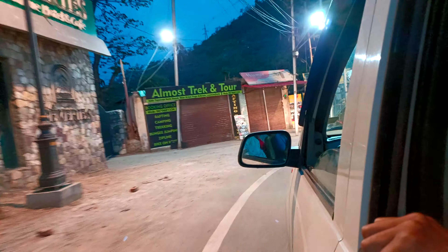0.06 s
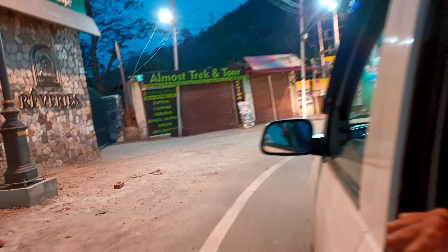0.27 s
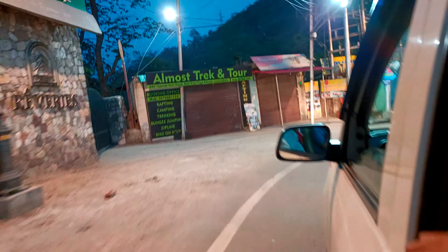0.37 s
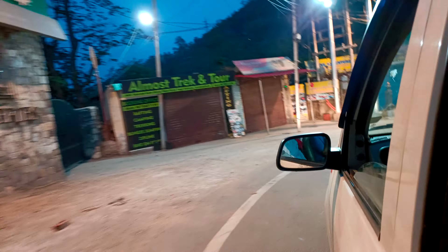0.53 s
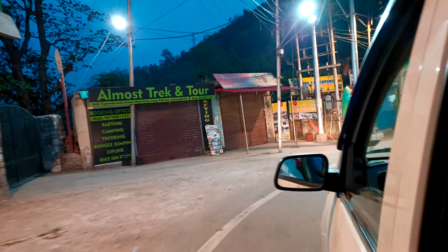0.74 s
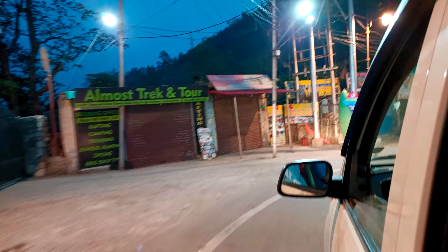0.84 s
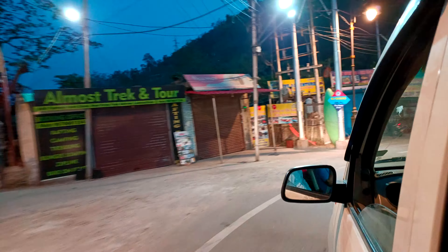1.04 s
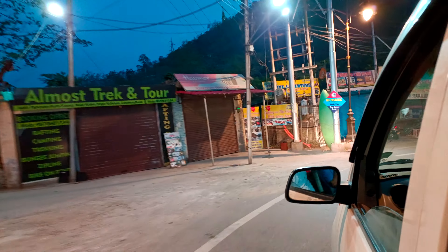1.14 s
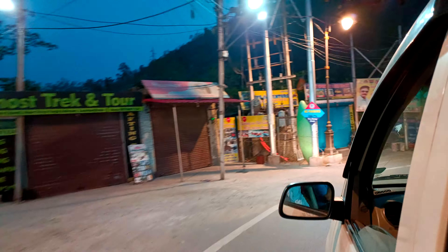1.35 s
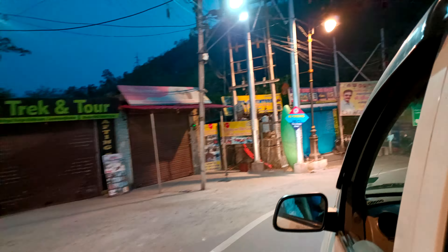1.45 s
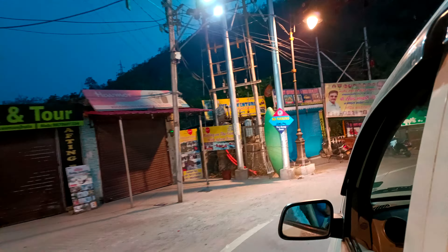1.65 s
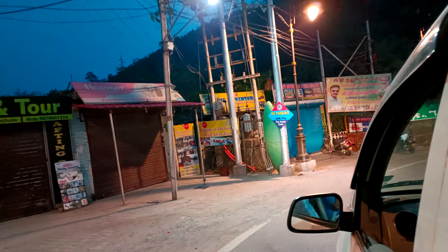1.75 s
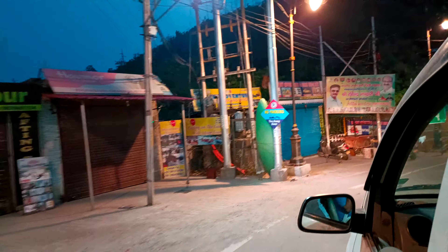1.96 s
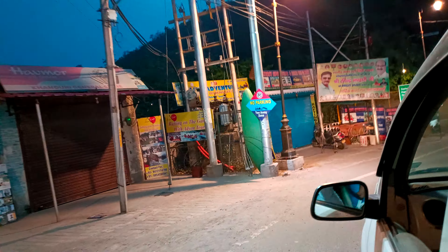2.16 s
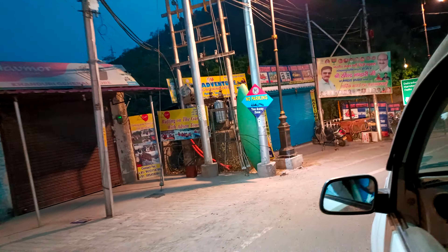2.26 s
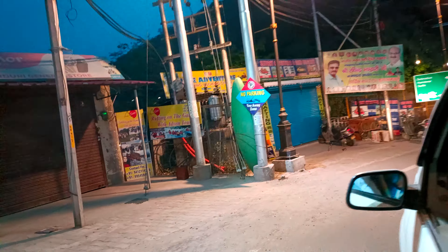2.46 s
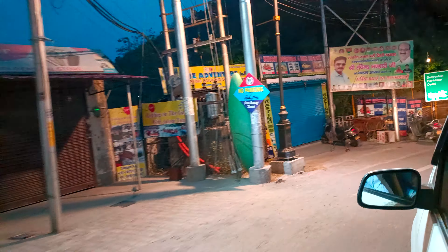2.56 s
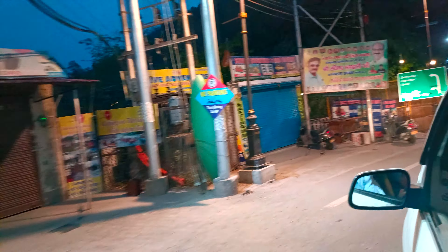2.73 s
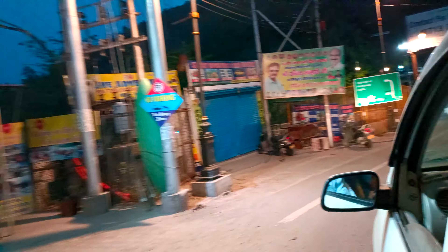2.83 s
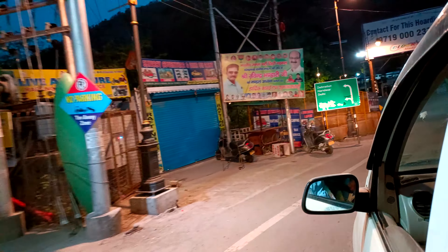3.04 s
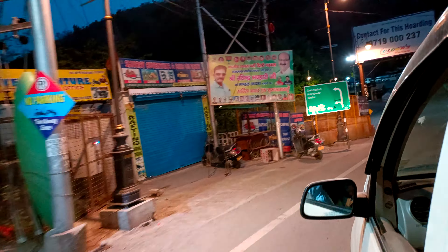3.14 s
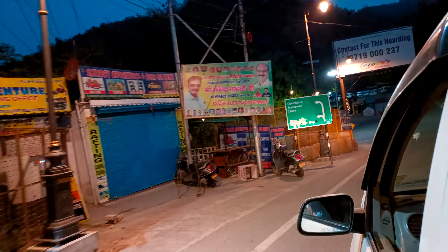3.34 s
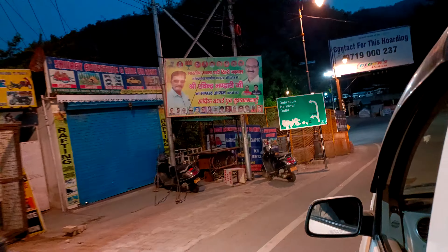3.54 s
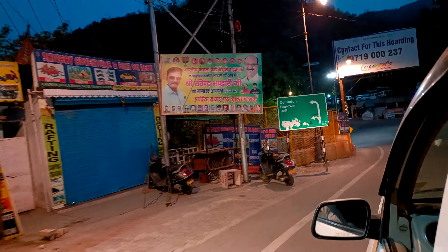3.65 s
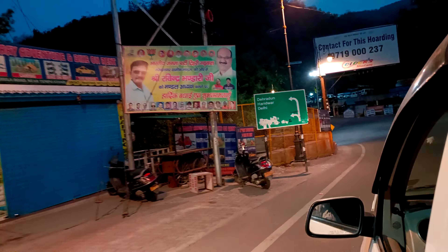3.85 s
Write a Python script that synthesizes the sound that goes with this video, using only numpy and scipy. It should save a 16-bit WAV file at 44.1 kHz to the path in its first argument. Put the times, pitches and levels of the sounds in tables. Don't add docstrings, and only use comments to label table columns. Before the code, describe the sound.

Low wind buffets a microphone held out of a moving car's window, over engine drone and tyre hiss, turning rougher and crackly halfway.

```python
import sys
import numpy as np
from scipy import signal
from scipy.fft import rfft, irfft
from scipy.io import wavfile
from scipy.ndimage import uniform_filter1d, minimum_filter1d

SR = 44100
rng = np.random.default_rng(int(sys.argv[2]) if len(sys.argv) > 2 else 0)


def elevation(decibels):
    levels = np.asarray(decibels, float)
    return 10 ** (levels / 20)


def transcribe(u):
    v = np.clip(np.atleast_2d(u).T, -1, 1)
    q = np.round(v * 32767).astype(np.int16)
    wavfile.write(sys.argv[1], SR, q)


N = 273420
TIME = np.arange(N) / SR
PORT_LAG = 22
MID_FIRING_HZ = 27.7

# (frequency [Hz], left port [dB], right port [dB])
CLATTER_COLOUR = [(1600, -20, -12), (2500, -12, -4), (4000, -8, 0), (6200, -13, -2), (7000, -22, -17),
                  (8100, -21, -36), (9500, -23, -24), (14000, -34, -22), (15600, -50, -30)]
# (frequency [Hz], left port [dB], right port [dB])
AIR_COLOUR = [(5000, -6, -15), (6800, 2, -8), (7700, 6, -9), (8200, 5, -13), (9300, 4, 0), (11000, 1, -1),
              (12500, -4, -1), (14200, -12, 1.5), (15700, -30, -6)]


def curves(table):
    s, *columns = np.transpose(table)
    return [np.interp(TIME, s, column) for column in columns]


def unit(x):
    return x / np.sqrt(np.mean(x ** 2))


def band(x, hz, width):
    return signal.lfilter(*signal.iirpeak(hz, hz / width, fs=SR), x)


def dull(x, top_hz):
    return signal.sosfilt(signal.butter(4, top_hz, fs=SR, output="sos"), x)


def noise(low_hz, high_hz, top_hz, even_s):
    slopes = signal.butter(1, [low_hz, high_hz], "band", fs=SR, output="sos")
    x = dull(signal.sosfilt(slopes, rng.standard_normal(N)), top_hz)
    span = int(even_s * SR)
    power = uniform_filter1d(uniform_filter1d(x ** 2, span), span)
    return x / np.sqrt(power)


def walk(rate):
    k = int(SR / rate)
    steps = np.repeat(rng.standard_normal(N // k + 1), k)
    return unit(uniform_filter1d(uniform_filter1d(steps, k), k)[:N])


def hiss(table, alike):
    hz, *port_db = np.transpose(table)
    f = np.log(np.arange(N // 2 + 1) * SR / N + 1)
    right, other = rng.standard_normal((2, N))
    left = alike * right + np.sqrt(1 - alike ** 2) * other
    ports = []
    for x, db in zip([left, np.roll(right, PORT_LAG)], port_db):
        colour = elevation(np.interp(f, np.log(hz), db, -60, -60))
        ports.append(irfft(rfft(x) * colour, N))
    return np.array(ports) / np.sqrt(np.mean(ports[1] ** 2))


def bumps(times, gains, lengths_s):
    power = np.zeros(N)
    for s, g, d in zip(times, gains, lengths_s):
        near = slice(max(int((s - 2 * d) * SR), 0), int((s + 2 * d) * SR))
        power[near] += g ** 2 * np.exp(-np.abs(1.8 * (TIME[near] - s) / d) ** 3)
    return np.sqrt(power)


def buffet(db, corner_hz, top_hz, flutter_db):
    return elevation(db + flutter_db * walk(30)) * noise(38.4, corner_hz, top_hz, 0.088)


def lulls():
    # (time [s], depth with either sign [dB], length [ms])
    gaps = [(3.067, 5, 8), (3.315, -10, 22), (3.337, -11, 10), (3.373, -7, 9), (3.397, -2, 8),
            (3.429, -5, 7), (3.446, -3, 25), (3.503, -9, 6.3), (3.529, -8, 8), (3.559, -19, 17),
            (3.596, -4, 12), (3.639, -11, 9.7), (3.679, -10, 27), (3.765, -0.5, 16), (3.864, -5, 11),
            (4.022, -4, 8), (4.089, -15, 25), (4.126, -10, 6.1), (4.16, -19, 9.2), (4.227, -17, 12.8),
            (4.265, -4, 12), (4.337, -14, 15), (4.38, -7.5, 9), (4.46, -3, 19), (4.518, -2, 23),
            (4.603, -13, 21), (4.671, -10, 4), (4.933, -5, 7.2), (5.063, -10, 6.6), (5.125, -12, 6.1),
            (5.175, -9, 25), (5.269, -8, 12), (5.345, -1, 7), (5.386, -2, 6), (5.459, -1, 25),
            (5.51, -11, 8), (5.529, -9, 10), (5.592, -6.5, 20), (5.747, -9, 18), (5.818, -6, 22),
            (5.862, 0, 24), (5.898, -10, 13), (6.004, -2.5, 15), (6.072, -5, 20), (6.184, -6, 5.7)]
    s, depth_db, ms = np.transpose(gaps)
    return elevation(-0.96 * bumps(s, depth_db, ms / 900))


def crowd(gust_db, swung):
    per_s = 20
    chance = rng.standard_normal((int(N / SR * per_s), 4)).T
    s = (np.arange(chance.shape[1]) + .5 + 0.13 * chance[0]) / per_s
    s = np.clip(s, 0, TIME[-1])
    base_db = (gust_db - 10.5 - 8.5 * swung)[(s * SR).astype(int)]
    return s, base_db + 3.5 * chance[1], -24 + 5 * chance[2], 12 * np.exp(1.07 * chance[3])


def snaps():
    # (time [s], level [dB], brightness [dB])
    tears = [(3.252, -26, -18), (3.5206, -24, -10), (3.5368, -25, -15), (3.899, -30, -9), (3.9446, -27, -2),
             (4.0267, -33, -15), (4.0466, -25, -14), (4.1152, -22, -17), (4.1325, -21, -16),
             (4.1443, -17, -5), (4.1705, -22.5, 1), (4.1807, -22, -2), (4.189, -28, -16), (4.205, -40, 9),
             (4.2944, -21, -6), (4.3123, -17, -1), (4.3284, -27, -9), (4.3526, -34, -12),
             (4.3652, -15.5, 1.5), (4.3921, -30, -14), (4.4294, -15.5, -11), (4.434, -29, -6),
             (4.474, -23.5, -4), (4.55, -30, -3), (4.556, -22, -7), (4.5609, -19, -14), (4.6658, -31, -16),
             (4.6783, -33, -13), (4.694, -33, -11), (4.702, -27, -8), (4.7123, -24, -2), (4.8205, -24, -13),
             (4.8261, -26, -15), (4.946, -22, -11), (4.9506, -24, -2), (4.979, -27, -11), (5.0044, -20, -3),
             (5.011, -27, 2), (5.0205, -35, -10), (5.101, -25, -24), (5.1117, -29, -18), (5.1172, -24, -13),
             (5.134, -29, -14), (5.255, -25, 6), (5.2597, -30, 5.5), (5.3355, -30, -11), (5.3543, -25, -16),
             (5.3682, -21, 5.5), (5.3729, -32, -4), (5.419, -27, -20), (5.5022, -33, -12), (5.52, -28, -9),
             (5.5412, -28, -8), (5.558, -27, 13.5), (5.605, -31, 2), (6.0942, -23, -14), (6.108, -31, -7),
             (6.1297, -19, -17), (6.1777, -24, -12), (6.1918, -26, -14)]
    s, db, bright_db = np.transpose(tears)
    lengths_s = np.full(len(s), 0.0018)
    snap = bumps(s, elevation(db + 6), lengths_s) * noise(730.0, 3000.0, 2500.0, 0.00077)
    tick = bumps(s, elevation(db + bright_db + 2.5), 0.8 * lengths_s) * noise(1950.0, 3050.0, 5900.0, 0.00089)
    return dull(snap, 2400.0) + dull(tick, 4900.0)


def eddies(small, gain):
    # (time [s], level [dB], brightness [dB], length [ms])
    timed = [(2.89, -9, -9, 19), (3.114, -15, -8, 43), (3.253, -15, -3, 17), (3.278, -17, -16, 32),
             (3.292, -9, -13, 7), (3.362, -12, -14, 51), (3.537, -10, 4, 47), (3.616, -7.5, -16, 37),
             (3.719, -10, -10, 20), (3.884, -8, -15, 7.6), (3.906, -8.5, -7, 32), (3.952, -13, -6, 5.3),
             (4.047, -2, 1, 3.5), (4.058, -10, -11, 73), (4.134, -12, -3, 17), (4.145, -14, 11, 8.5),
             (4.169, -8, -6, 34), (4.212, -16, -6, 25), (4.241, -6.5, -1, 15), (4.314, -10.5, -10, 130),
             (4.37, -10, -4.5, 41), (4.432, -10.5, -2, 17.6), (4.444, -8, -14, 6.1), (4.476, -9, -11, 20),
             (4.553, -13, 0, 44), (4.703, -12.5, -4, 37), (4.82, -5, -3.5, 17), (4.867, -12.5, -1.5, 23),
             (4.947, -10, -5.5, 19), (4.96, -12, -4, 7), (5.002, -10.5, -5, 34), (5.018, 0, 1, 4),
             (5.107, -10.5, -0.5, 28), (5.133, -16, -1, 14), (5.244, -8, -8, 27), (5.295, -12, -22, 33),
             (5.313, -12, -7, 6), (5.401, -18.5, -5, 48), (5.416, -13, -12, 6), (5.543, -4, -16, 6),
             (5.562, -8.5, -6, 68), (5.628, -17, -19, 82), (5.765, -13, -22, 25), (5.886, -24, -31, 23),
             (5.915, -12.5, -27, 30), (5.992, -12.5, -13, 24), (6.078, -20, -3, 6.4),
             (6.098, -11, -13, 27), (6.177, -4, -3, 22), (6.194, -10, -10, 6)]
    # (time [s], level [dB], brightness [dB])
    further = [(2.924, -8, -7.5), (3.133, -11, -14), (3.177, -15, -25), (3.224, -10.5, -12), (3.236, -8, -1),
               (3.33, -18, -7), (3.392, -15, -15), (3.417, -17, -15), (3.467, -14, -8), (3.501, -7, -11),
               (3.516, -8, -3), (3.584, -9.5, -19), (3.656, -4, -12), (3.669, -19, -4), (3.758, -13, -10),
               (3.787, -10.5, -13), (3.828, -14, -9), (3.843, -16, -3.5), (3.871, -18, -22),
               (3.937, -5, -4.5), (3.963, -15, -19), (3.977, -13, -17), (4.004, -4, -14), (4.029, -8, 2),
               (4.112, -6, -5), (4.274, -14, -9), (4.291, -12, -5), (4.327, -1, -12), (4.392, 1, -19),
               (4.536, -15, 2), (4.591, -10, -4), (4.625, -6.5, -23), (4.665, -8, -13), (4.678, -16, 1),
               (4.73, -6, -16), (4.743, -12, -21), (4.916, -7, -13), (4.979, -16, 4), (5.054, -17, -18),
               (5.147, -8, -12), (5.189, -3, -11), (5.336, -10, -1), (5.364, -4, -3), (5.44, -15, -20),
               (5.484, -13, -8), (5.502, -5, -10), (5.519, -5.5, -2), (5.614, -20, -16), (5.652, -21, -17),
               (5.708, -15, -18), (5.733, -16, -12), (5.823, -10, -22), (5.844, -18, -26), (5.98, -17, -2),
               (6.024, -12.5, -19), (6.042, -10, -18), (6.057, -9, -8), (6.126, -11, -6), (6.139, -9, -7),
               (6.165, -4, -9)]
    # (time [s], level [dB], length [ms])
    swirls = [(.019, -13, 22), (.179, -15, 42), (.32, -13, 17), (.43, -17, 26), (.56, -10, 38),
              (.63, -9.5, 26), (.715, -16.5, 36), (.825, -5, 8), (.879, -5, 17), (1.01, -24, 27),
              (1.076, -5.5, 5.4), (1.27, -22, 37), (1.317, -13.5, 13), (1.407, -16.5, 8.3),
              (1.581, -17.5, 65), (1.9, -15.5, 21), (2.214, -11, 16), (2.405, -17.5, 53), (2.47, -8, 7.9),
              (3.285, -8.5, 27), (3.41, -19, 48), (3.78, -17, 41), (4.6, -9, 10), (5.187, 6, 9.8),
              (5.393, -12.5, 56), (5.625, -17, 33), (6.032, -20, 44)]
    further_rows = np.insert(further, [3], 9.3, axis=1).T
    swirl_rows = np.insert(swirls, [2], -28, axis=1).T
    s, db, bright_db, ms = np.hstack([np.transpose(timed), further_rows, swirl_rows, small])
    grain = 0.9 * walk(150) + 0.3 * walk(60)
    body = bumps(s, elevation(db), ms / 800) * elevation(1.93 * grain) * noise(121.0, 446.0, 720.0, 0.01)
    body = np.where(TIME > 2.83, body, dull(body, 537))
    fast = bumps(s, elevation(db + bright_db - 3.4), ms / 900)
    edge = fast * elevation(3 * grain) * noise(640., 1000., 1300., .007)
    fray = fast * elevation(9.2 * walk(350) - 30.5) * noise(1400.0, 3600.0, 2200.0, 0.0033)
    return gain * (body + edge + fray)


def thumps():
    # (time [s], level [dB], length [ms])
    slow = [(0.072, -10.5, 40), (0.413, -3, 17), (0.912, -11, 62), (1.477, -12, 85), (2.06, -13, 42),
            (2.522, -20.5, 170), (2.644, -13, 39), (2.855, -20, 84), (3.358, -21, 180), (3.556, -29, 130),
            (3.644, -6, 17), (3.755, -10, 45), (4.221, -16, 55), (4.463, -16, 160), (4.556, -13, 41),
            (4.986, -12.5, 83), (5.383, -13, 15), (5.641, -9, 103), (6.102, -9, 37)]
    s, db, ms = np.transpose(slow)
    return bumps(s, elevation(db), ms / 1000) * noise(48.0, 160.0, 243.0, 0.0084)


def exhaust(firing_hz, since, chance):
    # (time [s], exhaust boom [dB], rasp of the upper resonances [dB])
    load = [(0, -17.5, -30), (.5, -29.5, 4.5), (1, -18.5, -1), (1.4, -25, 4), (1.8, -21, 0.5),
            (2.2, -19, -8), (2.7, -18.5, -1), (2.95, -24, -11), (3.3, -16.5, -5), (3.7, -17.5, -10),
            (4.2, -16, 2.5), (4.5, -18, -0.5), (4.8, -11.5, -24), (5.1, -14.5, -18), (5.5, -18, -7),
            (6.2, -17, -18)]
    # (frequency [Hz], width [Hz], level [dB])
    low_modes = [(106.5, 17.8, 4.5), (127.8, 33.4, 2), (160.8, 24.4, 1), (259, 87, -3.5)]
    # (frequency [Hz], width [Hz], level [dB])
    upper_modes = [(370, 127, -5), (736, 216, -4.5), (864, 290, -7.5), (1260, 840, -14.5)]
    # (time [s], tilt to the lowest [dB], second resonance [dB])
    fronts = [(0, 2.5, 6), (1.5, -2, -0.5), (2.5, .5, -0.5), (3.3, -1.5, 2.5), (3.65, -2, 2.5),
              (3.9, 3.5, -8), (4.0, 4.5, 3), (4.15, -5, -0.5), (4.3, 1, -3), (4.4, 5, -7.5),
              (4.55, 4.5, -5), (4.7, 1.5, -1.5), (4.95, 1.5, 2.5), (5.15, 0, 2), (5.35, -0.5, 2),
              (6.2, 2.5, -2)]
    # (delay [ms], level [dB])
    echoes = [(5, -8.5), (13, -8.5), (21, -9)]
    boom_db, upper_db = curves(load)
    lift = bumps([3.3], [1], [0.12])
    bark_db = -22 + 0.43 * (boom_db + 17.5) - 11.5 * lift
    puff = -np.exp(-since / .035) * elevation(2.2 * chance)
    puff = signal.sosfilt(signal.butter(2, 85, "high", fs=SR, output="sos"), puff)
    rough = puff + 0.75 * np.exp(-since / 0.2) * rng.standard_normal(N)
    speed_db = -0.27 * (firing_hz - MID_FIRING_HZ)
    tilt_db, middle_db = curves(fronts)
    shift_db = [tilt_db + speed_db, middle_db + speed_db, -tilt_db, -1.25 * speed_db]
    boom, bark = np.zeros((2, N))
    for k, (hz, width, db) in enumerate(low_modes):
        boom += (-1) ** k * elevation(db + shift_db[k]) * band(puff, hz, width)
    for k, (hz, width, db) in enumerate(upper_modes):
        bark += (-1) ** k * elevation(db + (k > 0) * upper_db) * band(rough, hz, width)
    pipe = elevation(boom_db) * dull(unit(boom), 308.0) - elevation(bark_db) * dull(unit(bark), 1090.0)
    street = pipe.copy()
    for ms, db in echoes:
        delay_s = (ms + 0.54 * walk(1.55)) / 1000
        street += elevation(db) * np.interp(TIME - delay_s, TIME, pipe)
    return np.array([street, np.roll(street, PORT_LAG)])


def clatter(firing_hz, since, chance):
    # (middle [s], level [dB], length [s])
    rattles = [
        (4.93, -35.5, 0.053),
        (5.12, -38, 0.17),
        (5.15, -44, 0.8),
    ]
    # (time [s], level [dB])
    knocks = [(3.872, -33), (3.909, -40), (3.947, -37), (3.984, -37), (4.022, -31), (4.401, -28),
              (4.591, -37), (4.819, -32), (4.833, -33), (4.898, -30), (4.936, -29), (4.989, -39),
              (5.027, -24.5), (5.067, -28), (5.108, -29), (5.149, -35), (5.19, -25.5), (5.232, -31),
              (5.274, -41), (5.316, -38), (5.357, -36), (5.399, -36), (5.527, -27.5), (5.54, -29),
              (5.83, -34), (5.873, -31), (5.918, -33), (6.006, -33), (6.14, -29), (6.185, -35)]
    beat = np.clip(0.015 * (40.6 - firing_hz), 0, 1)
    stroke = unit(np.exp(-since / .2) * elevation(1.8 * chance))
    valves = elevation(-41 + 0.25 * (firing_hz - MID_FIRING_HZ)) * np.sqrt(1 - beat + beat * stroke ** 2)
    s, db, length_s = np.transpose(rattles)
    shake = unit((.25 + np.exp(-since / .25)) * elevation(.6 * chance + 1.8 * walk(70)))
    panel = bumps(s, elevation(db), length_s) * shake
    s, db = np.transpose(knocks)
    panel = np.hypot(panel, bumps(s, elevation(db - 2.5), np.full(len(s), 0.0048)))
    return np.hypot(valves, panel) * hiss(CLATTER_COLOUR, 0.19)


def engine():
    # (time [s], firing rate [Hz])
    firing = [(0.0, 29.85), (0.4, 31.96), (0.8, 31.93), (1.2, 32.19), (1.6, 32.55), (2.0, 33.5),
              (2.4, 34.4), (2.6, 35.3), (2.75, 35.2), (3.0, 32.94), (3.35, 26.47), (3.7, 26.45),
              (4.1, 26.78), (4.5, 26.07), (4.9, 24.88), (5.3, 24.02), (5.7, 23.21), (6.2, 21.38)]
    firing_hz = curves(firing)[0]
    turns = .33 + np.cumsum(firing_hz) / SR + .009 * walk(25)
    chance = rng.standard_normal(N // 1000)[turns.astype(int)]
    since = turns % 1
    return exhaust(firing_hz, since, chance) + clatter(firing_hz, since, chance)


def grit():
    # (time [s], level [dB])
    grains = [(1.6487, -37), (2.6224, -40), (3.2326, -38), (3.9848, -45), (4.2088, -46), (4.3116, -47),
              (4.4378, -39), (5.0654, -40), (5.1472, -48), (5.5248, -42), (5.5563, -47), (5.6101, -50),
              (5.8711, -41), (5.9604, -44), (5.992, -38), (6.0496, -48)]
    s, db = np.transpose(grains)
    colour = hiss(AIR_COLOUR, 0.46) + elevation(8) * hiss(CLATTER_COLOUR, 0.4)
    return bumps(s, elevation(db - 5.5), np.full(len(s), 0.0017)) * colour


def road():
    # (time [s], air hiss [dB], tyre hiss off the walls [dB], roar of the surface [dB])
    speed = [(0, -57, -29.5, -28), (.4, -56.5, -29.5, -30.5), (.9, -55.5, -28, -30.5),
             (1.2, -55.5, -28.5, -30), (1.5, -54, -28.5, -30), (1.9, -52.5, -28, -26),
             (2.4, -53.5, -29.5, -27), (2.8, -52.5, -30, -26.5), (3.1, -53, -31, -36.5),
             (3.7, -55.5, -34, -29), (4.2, -57, -35.5, -49), (4.65, -58.5, -36.5, -39),
             (5.0, -54, -33, -40), (5.4, -60, -34.5, -42), (5.8, -57.5, -34.5, -36), (6.2, -61, -35.5, -40)]
    # (frequency [Hz], left port [dB], right port [dB])
    tyre_colour = [(900, -12, -12), (1100, -6, -5), (1350, -5, -2), (1750, -10, -4.5), (2250, -6.5, .5),
                   (2900, -9, -2), (3500, -15, -8), (4200, -20, -15), (5500, -25, -23), (7000, -38, -46)]
    # (frequency [Hz], left port [dB], right port [dB])
    roar_colour = [(100, -19, -24), (248, -8, 4), (403, -23, -8), (650, 4, 1.5), (892, 0, 0.5),
                   (1080, -8, -13.5), (1276, -13, -4)]
    air_db, tyre_db, roar_db = curves(speed)
    tyres = elevation(tyre_db + 0.51 * walk(8.7)) * hiss(tyre_colour, 0.19)
    roar = elevation(roar_db + walk(6.26)) * hiss(roar_colour, 0.035)
    air = hiss(AIR_COLOUR, 0.024)
    lower = dull(air, 10200.0)
    air = elevation(3.2 * walk(50)) * lower + elevation(0.83 * walk(40)) * (air - lower)
    return tyres + roar + elevation(air_db) * air


def scene():
    # (time [s], gust level [dB])
    wind = [(0, -18), (.45, -10), (.85, -17.5), (1.2, -18.5), (1.55, -16), (2.2, -22.5), (2.62, -8.5),
            (2.84, -21.5), (2.9, -6), (2.96, -15), (3.08, -12.5), (3.2, -11), (3.55, -11.5), (4.2, -16),
            (5.05, -17.5), (5.4, -12), (5.65, -15), (5.95, -16)]
    gust_db = curves(wind)[0]
    swung = np.interp(TIME, [2.5, 3.2], [0, 1])
    sheltered_db = -24.5 + 5.5 * swung + 3 * walk(2.87)
    gain = lulls()
    left = np.sqrt(gain) * buffet(gust_db, 162.0, 330.0, 5.6)
    left = left + eddies(crowd(gust_db, swung), gain) + snaps()
    right = buffet(sheltered_db, 95., 250., 2) + thumps()
    return np.array([left, right]) + engine() + road() + grit()


def roll_off(x):
    return signal.sosfilt(signal.butter(12, 15680, fs=SR, output="sos"), x)


def record(dry):
    ceiling = .89
    x = signal.sosfilt(signal.butter(2, 17, "high", fs=SR, output="sos"), dry)
    need = np.minimum(1, 1.1 * ceiling / (np.abs(x) + 1e-9))
    span = int(.004 * SR)
    x = x * uniform_filter1d(minimum_filter1d(need, 2 * span), span)
    x = x / (1 + (np.abs(x) / ceiling) ** 12) ** (1 / 12)
    return roll_off(x)


dry = scene()
out = record(dry)
transcribe(out)
```